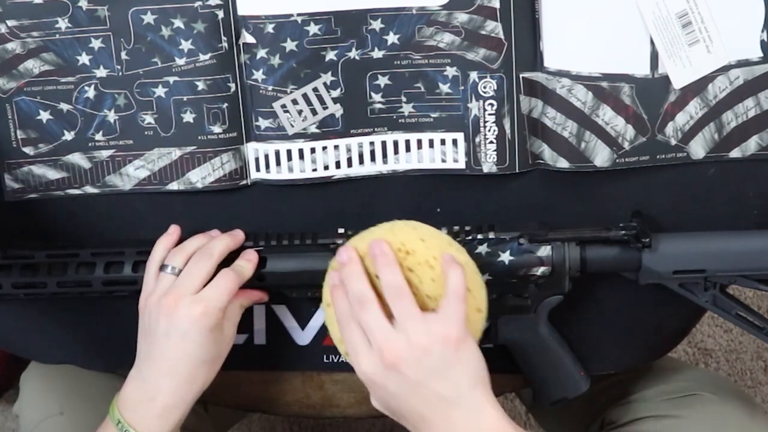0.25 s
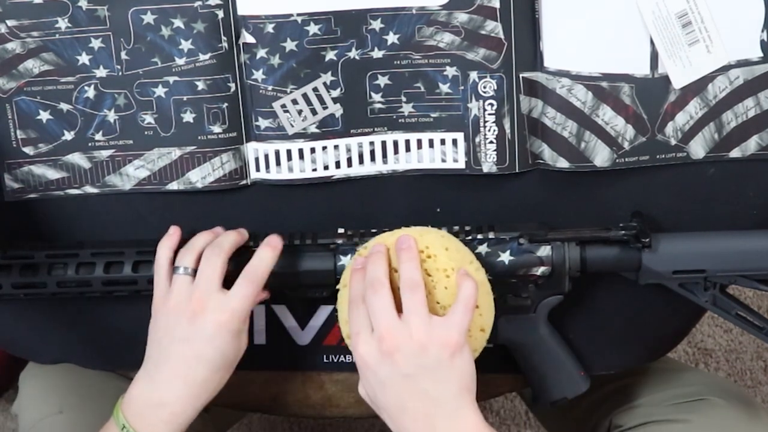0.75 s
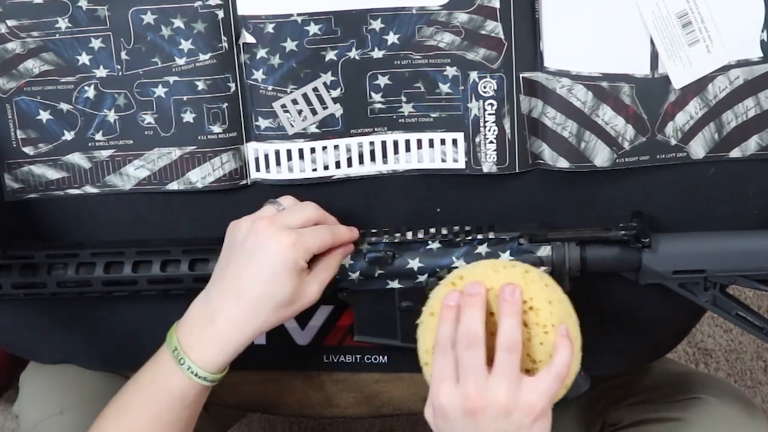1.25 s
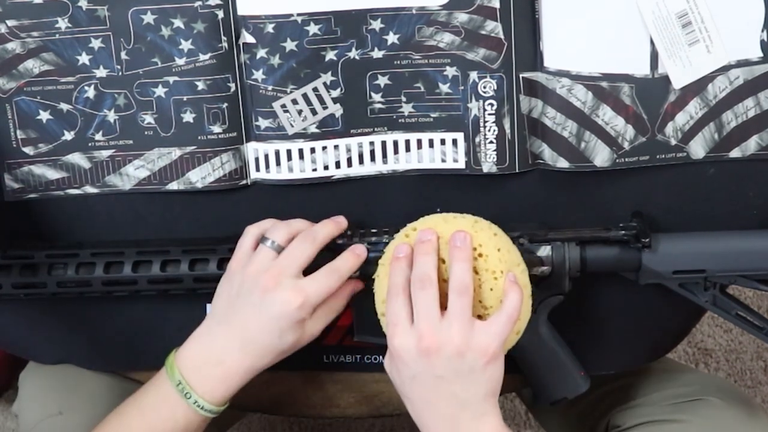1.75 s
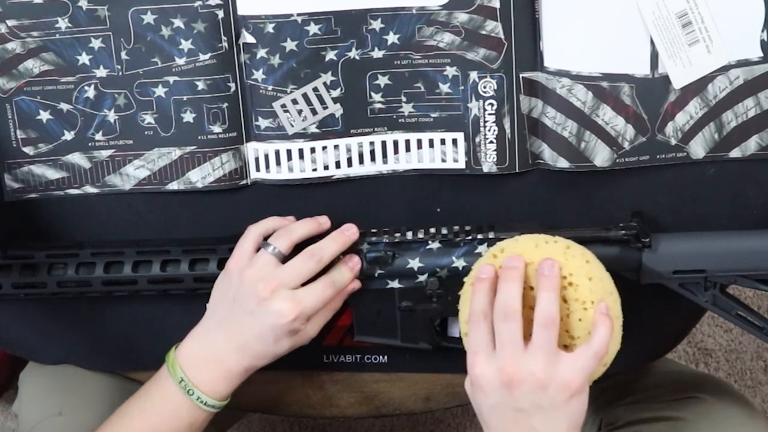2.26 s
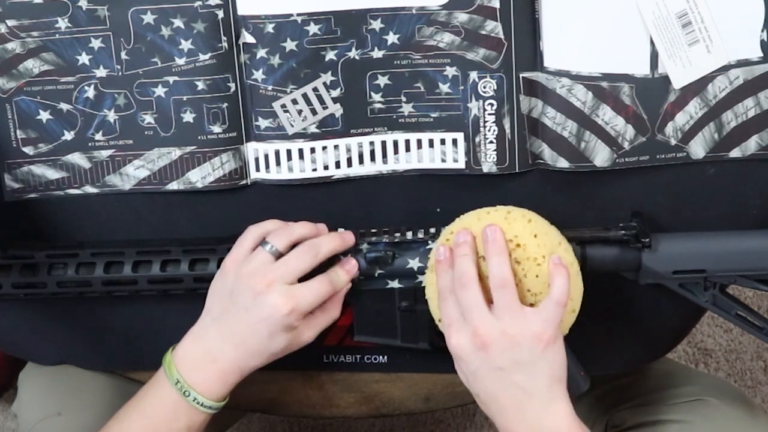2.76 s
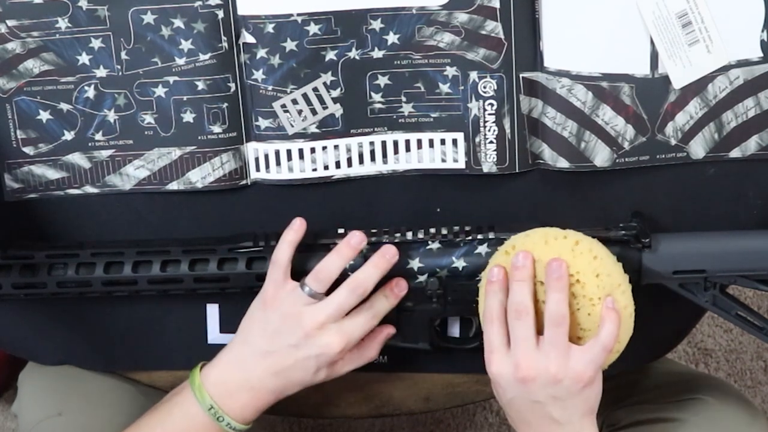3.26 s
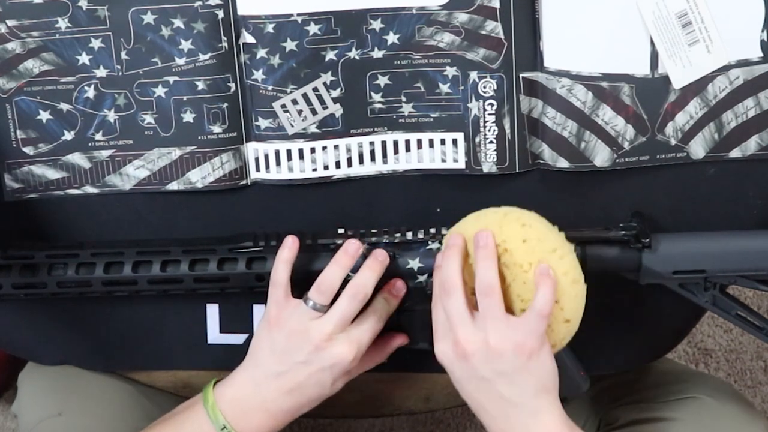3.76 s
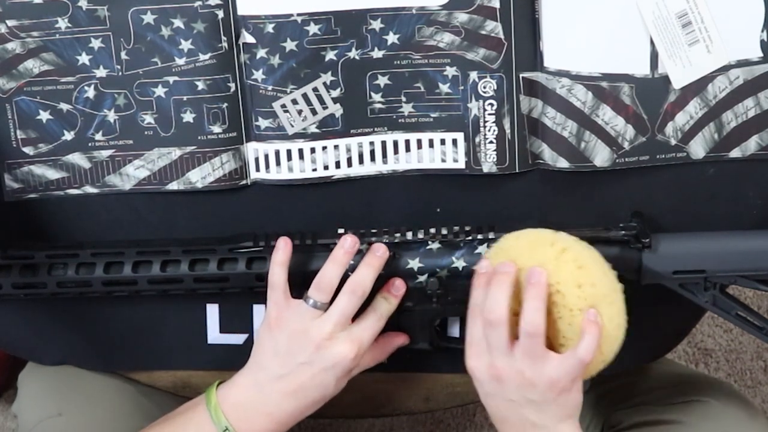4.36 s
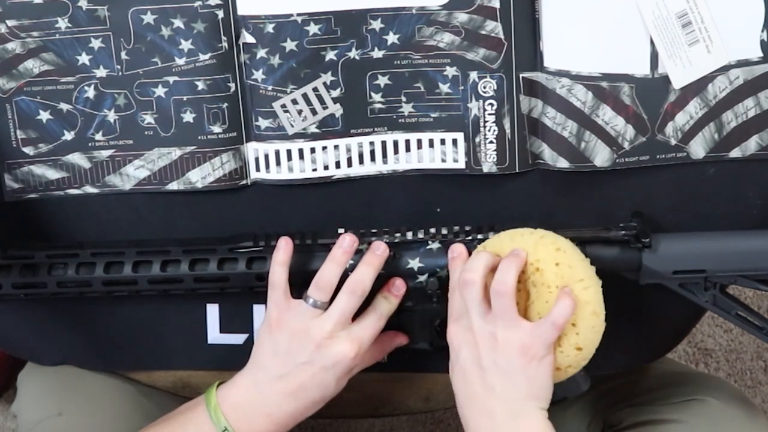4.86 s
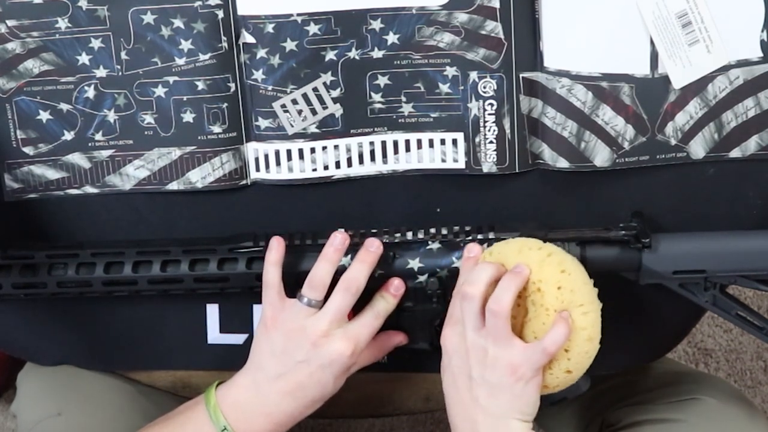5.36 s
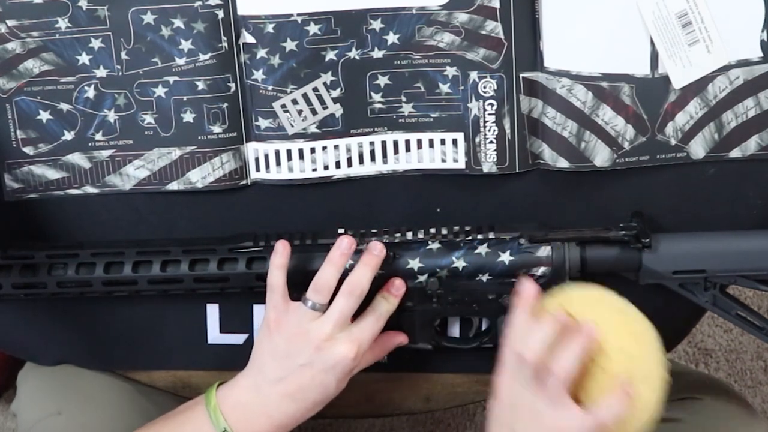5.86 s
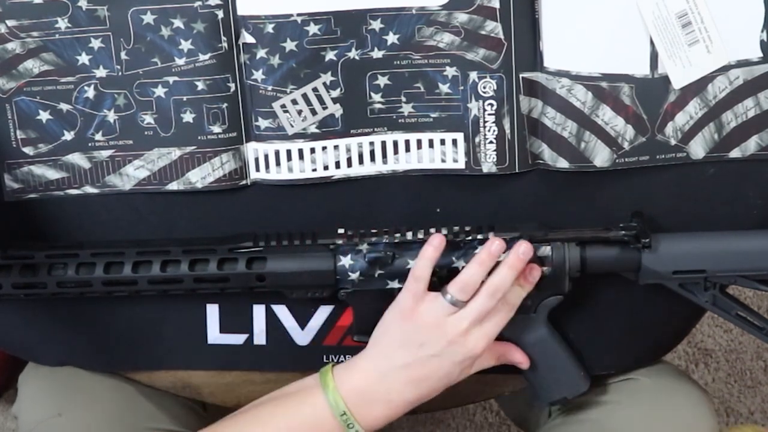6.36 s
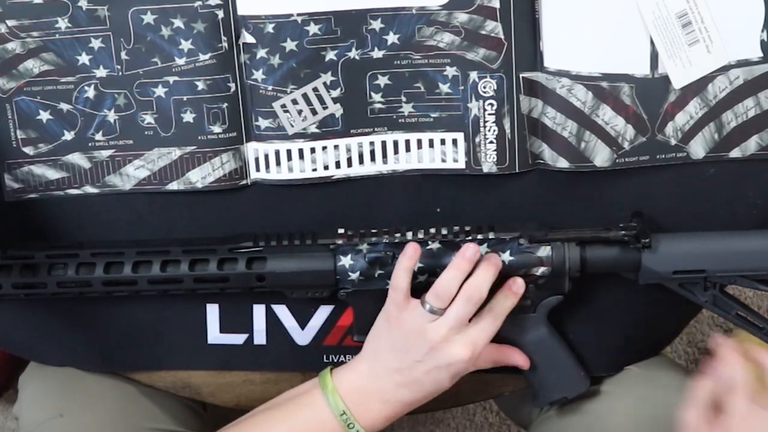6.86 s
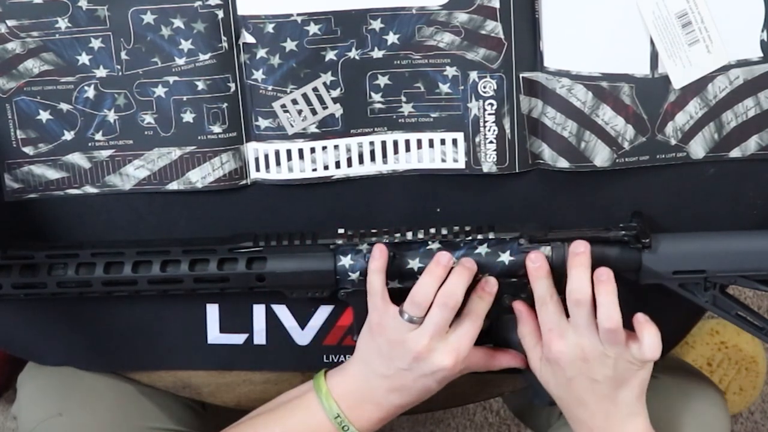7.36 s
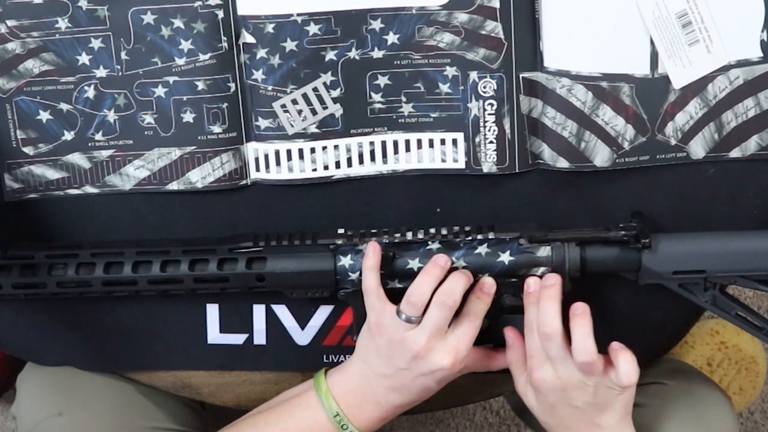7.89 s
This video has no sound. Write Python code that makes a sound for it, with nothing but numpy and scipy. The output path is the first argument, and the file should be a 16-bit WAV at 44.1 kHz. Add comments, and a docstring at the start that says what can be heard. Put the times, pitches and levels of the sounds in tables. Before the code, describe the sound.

Close and nearly dry in a small room, a sponge rubs plastic film on a metal part. An early double thump shakes the table, then soft scuffs, light ticks and sparse creaks follow. After four seconds come dull knocks, then a dense burst of creaks, thumps and hard knocks. It calms to faint skin brushes and two soft bumps. A beating low motor hum and microphone hiss continue throughout.

```python
"""A sponge and bare hands rub a plastic film onto a metal part on a mat, while a beating motor hum and hiss last.
At first clumped pore releases scuff, film and sponge chatter in short creaks, and jolts shake the table's modes.
Light ticks of decaying noise and sparser strokes follow; after four seconds struck modes of the part knock.
Past five seconds creaks crowd together, with hard knocks and dull decaying bumps of the mat.
Then noise brushes softly as skin on film, and a faint rising tone and a broken whistle swell near the end."""
import sys
import numpy as np
from scipy import signal
from scipy.fft import rfft, irfft, next_fast_len
from scipy.io import wavfile
from scipy.ndimage import uniform_filter1d

SR = 44100
rng = np.random.default_rng(int(sys.argv[2]) if len(sys.argv) > 2 else 0)


def put_to_file(sound):
    """Save the sound as 16-bit audio at rate SR, in the file named by the first command-line argument."""
    columns = np.atleast_2d(sound).T  # one column per channel
    safe = np.clip(columns, -1, 1)
    whole_steps = np.round(safe * 32767)
    wavfile.write(sys.argv[1], SR, whole_steps.astype(np.int16))


N = 358533

# Microphone hiss spectrum: (frequency [Hz], relative density [dB per Hz])
HISS_SPECTRUM = [(20, 4), (40, -7.5), (90, 4), (150, -6), (220, -4), (400, -9), (800, -17), (1600, -22),
                 (3200, -24), (6400, -24.5), (12000, -27), (15700, -27.5)]
# Faint noise of opposite sign in the two channels: (frequency [Hz], level relative to the hiss [dB])
SIDE_NOISE = [(60, -45), (110, -21.5), (200, -67), (380, -22), (700, -21), (1290, -29), (2380, -30.5),
              (4400, -25), (8120, -14), (15000, -10)]
HISS_DB, BAND_EDGE_HZ = -51, 15760

# Motor orders: (multiple of the turning rate [1], level [dB rms])
MOTOR_ORDERS = [(9, -61), (14, -52), (15, -52.5), (16, -63)]
# Faint rising tone, end values held outside: (time [s], level [dB rms], frequency [Hz])
RISING_TONE = [(6.6, -73, 159.5), (7.0, -58.5, 168.5), (7.7, -58, 186.2), (8.0, -68, 188)]
MOTOR_HZ, FIRST_THROB_S = 16.6627, 0.006  # turns a second, moment when the orders first align

# Hands jolt the table; times under 5 ms act as 5 ms: (peak time [s], level of the top's mode [dB],
# its frequency [Hz], 20 dB rise [s], 20 dB fall of the top [s], sway of the legs relative to the top [dB])
TABLE_JOLTS = [(.17, -48, 82.2, -0.06, 0.28, -1), (.322, -13, 77.1, .02, 0.0574, -9.5),
               (.365, -17, 79.6, .04, 0.0636, -6), (.62, -52, 77.6, 0.2, 0.14, 6.5),
               (.86, -47, 83, 0, -0.18, -10), (.954, -40.5, 85, 0.04, 0.03, -14),
               (1.24, -48, 79.8, .12, .06, 3), (1.42, -49, 78, .1, .13, -8),
               (1.575, -45, 78, 0.05, 0.16, -20), (1.72, -47, 78, .3, 0.13, -20),
               (1.933, -36, 83.7, 0, 0.06, -15), (2.165, -47.5, 85, .13, 0.1, -5),
               (2.33, -47.5, 82.8, 0.1, 0.1, -11), (2.77, -45.5, 75, 0.17, .18, -1.5),
               (3.28, -47.5, 77.7, 0.06, 0.08, 7), (3.475, -33, 78, 0.09, 0.04, -5),
               (3.55, -38, 78.02, 0.22, 0.1, -15), (4.38, -46.5, 88, -0.1, 0.04, 7.5),
               (4.86, -58, 87.7, -0.08, .08, 11.5), (5.06, -23, 82.9, 0.04, 0.03, -28),
               (5.155, -29, 81.5, 0.06, 0.04, -8), (5.215, -26.5, 80.6, .08, .08, -8),
               (5.27, -20.5, 81, 0.08, .05, -14), (5.38, -25.5, 85.7, .08, 0.11, -23),
               (5.47, -39, 83.8, -0.02, 0, -3), (5.59, -26.5, 84, 0.12, 0.11, -13),
               (5.7, -24, 82.6, .11, .12, -23), (5.82, -22, 82.6, 0.06, .07, -12),
               (6.0, -50.5, 85, 0.26, 0.24, -4), (6.44, -27.5, 78, 0.04, 0.1, -15.5),
               (6.58, -36, 77.7, 0.02, 0.1, -2), (7.15, -37, 81, 0.03, 0.04, -21),
               (7.33, -48, 82.4, 0.2, 0.06, -2), (8.12, -49, 82, 0.2, 1, -15)]
JOLT_ROUNDNESS, SWAY_FALL_RATIO = 1.24, 2.3  # 1 = pointed peak, 2 = round; fall of legs over fall of top
STILL_DB, STILL_HZ, STILL_SWAY_DB = -65, 83.2, -62  # the table between jolts
TOP_WAVER = 0.03  # rms share of the top's frequency
SWAY_HZ, SWAY_DRIFT_HZ = 45.7, 3.1  # centre, rms deviation
RATTLE_HZ, RATTLE_DRIFT_HZ, RATTLE_DB = 350.5, 25, -30  # centre, rms deviation, relative to the top

# Dull bumps: (time [s], nominal level [dB], high modes relative to low [dB], 60 dB decay [s])
DULL_BUMPS = [(0.312, -31, -10, 0.22), (0.351, -28, -1, 0.073), (0.443, -29.5, -23, 0.076),
              (3.267, -48, -2.5, 0.15), (3.459, -39, -5, 0.1), (5.519, -35, -2.5, 0.15),
              (5.649, -34.5, -7, 0.15), (5.79, -39.5, -3, 0.11), (5.875, -53, 10, 0.12),
              (6.536, -27.5, -19, 0.092), (6.572, -30, -16.5, 0.17)]
# Low, then high modes of mat and table top: two lists of (frequency [Hz], relative level [dB])
MAT_MODES = [(108, 3.5), (135, -1), (160, -20)], [(285, 0.5), (350, 0), (430, -11.5)]

# Faint fuzzy whistle, end values held outside: (time [s], level before its flutter [dB rms])
WHISTLE = [(6.9, -76), (7.2, -71), (7.55, -82)]
WHISTLE_HZ = 1314

# Skin brushes the film: (peak time [s], peak envelope [dB], half length to 1/e [s])
SKIN_BRUSHES = [(6.25, -54.5, 0.04), (6.631, -57.5, .02), (6.818, -54, 0.039), (7.239, -53.5, 0.021)]
# Spectrum of skin on film: (frequency [Hz], relative density [dB per Hz])
SKIN_SPECTRUM = [(2000, -12), (3300, -11.5), (4200, -5.5), (5000, -14), (6000, -18), (9000, -23)]

# Modes of the metal part on the mat: (frequency [Hz], relative level [dB], 60 dB decay [s])
PART_MODES = [(586, -2.5, 0.013), (783, -15, .025), (982, -10, 0.043), (1210, -6.5, 0.023),
              (1784, 4, 0.017), (2110, 3.5, 0.017), (2770, -1, 0.031), (3230, 6.5, .015), (3900, 4, 0.018)]
MODE_DETUNE = 0.02  # rms share of a mode's frequency
# Taps of nail, ring or part: (time [s], nominal level [dB], struck region [Hz], relative tick [dB])
HAND_TAPS = [(.472, -48, 3100, 10), (0.5, -50, 3100, 17), (0.869, -45, 3140, 14.5), (4.336, -25, 700, -17),
             (4.647, -19.5, 600, -13.5), (5.783, -11.5, 660, -19), (5.863, -16, 600, -32),
             (6.464, -40, 4150, -10), (6.679, -33.5, 1030, -9), (8.056, -30.5, 1152, -7.5),
             (1.946, -44.5, 2990, -4), (1.969, -46, 3000, -2)]

# Slips of sponge and film: (time [s], nominal level [dB], answering region [Hz], relative crack [dB])
FILM_SLIPS = [(0.291, -33, 985, -9), (0.31, -28.5, 2320, -4), (0.338, -32.5, 1830, -2),
              (1.168, -29, 1810, -1.5), (1.196, -28.5, 1270, -7), (1.53, -37, 1800, -5),
              (2.582, -39.5, 1450, -3), (2.819, -40, 802, 0), (2.93, -30, 1310, -5),
              (3.339, -32.5, 810, -9), (4.029, -38, 1550, -6), (5.215, -30, 980, -8.5),
              (5.314, -33, 982, -6.5), (5.348, -30, 1434, -6), (5.389, -37.5, 1670, -1.5),
              (5.415, -32.5, 3160, -1.5), (5.488, -33, 2078, 1), (5.507, -29, 2257, 0),
              (5.523, -28, 1650, -1), (5.54, -31, 1134, -14), (5.556, -26.5, 1094, -5.5),
              (5.59, -25.5, 1702, -8), (5.615, -28, 1090, -5), (5.644, -26, 1091, -10),
              (5.654, -24, 2635, -6), (5.69, -29.5, 1133, -8), (5.709, -32.5, 1076, -2.5),
              (5.744, -28, 1687, -6.5), (5.792, -30.5, 2000, -2.5), (6.915, -41, 1250, -3)]
SLIP_S = 0.0094  # time scale of one run of chatter

# Strokes of sponge and fingers; times under 5 ms act as 5 ms: (peak time [s], scrape level [dB],
# 20 dB rise [s], 20 dB fall [s], film rustle relative to scrape [dB], dull drag relative to scrape [dB])
RUB_STROKES = [(.12, -60, 0.1, .3, -2, 0), (.23, -57.5, 0.05, 0.23, 1, -10),
               (0.331, -45, 0.13, 0.0662, -1, 1.5), (.5, -64.5, 0.5, 0.2, 0.5, 0),
               (.78, -59.5, -0.04, .4, 0.5, 3), (.94, -59.5, 0.2, 0.37, 2.5, -5.5),
               (1.145, -53.5, .04, .1, 6, 1), (1.185, -48, 0.0649, 0.07, 5, 1),
               (1.269, -56.5, 0, 0.12, -2.5, 2), (1.53, -53.5, -0.07, 0.05, -2, -9),
               (1.92, -57.5, 0.27, 0.48, 1, -5), (2.14, -48, 0.05, .1, -3.5, -6),
               (2.185, -46.5, .1, .045, 0, -2), (2.4, -64.5, 0.5, .4, 1.5, 0),
               (2.69, -56, 0.45, 0.2, -2.5, 0.8), (2.84, -55.5, 0.18, 0.23, 2.5, -2),
               (2.926, -41, 0.0851, 0.0558, -3.5, -7), (3.34, -53.5, .04, 0.04, -4, -2),
               (3.43, -61, 0.2, 0.25, 0.5, 1), (3.63, -50, 0.21, 0.18, -5, -3),
               (3.695, -52, 0.16, .05, 3, 0.5), (3.93, -60.5, 0.2, 0.47, -1.5, -7),
               (4.391, -46.5, 0.1251, 0.07, 0, -3.5), (4.65, -54.5, .03, 0.1, -8, 4.5),
               (4.76, -55.5, 0.14, 0.2, -3, 5), (4.88, -56, 0.1, .11, -4, -6),
               (5.2, -63.5, 0.2, -0.3, -7, 2), (5.43, -61, .25, 0.56, 4, 2),
               (5.53, -50, 0.12, .4, -4.5, -8), (5.63, -53, 0.35, 0.16, -7, 2),
               (5.72, -49, 0.09, .15, -3.5, -4), (5.8, -50, .15, 0.16, -4, -2.5),
               (5.885, -49, 0.2, 0.09, 0, 1.5), (6.85, -65, 0.7, 0.1, 3, -2)]
STROKE_ROUNDNESS = 1.16
# Hands lying on the film between strokes: (scrape level [dB], relative rustle [dB], relative drag [dB])
RESTING_HANDS = (-69, 0, 1)
# Friction spectra from low to high, each: (frequency [Hz], relative density [dB per Hz])
DRAG_SPECTRUM = [(200, -3), (420, 1), (600, 5.5), (1000, 1.5), (1300, -19), (1800, -51)]
SCUFF_SPECTRUM = [(200, 11.5), (420, 1), (600, 5), (1000, 1.5), (1700, 0), (2300, 2), (3200, -39)]
SCRAPE_SPECTRUM = [(700, -28), (1100, 1), (1700, 5), (2300, -8), (3200, -23)]
RUSTLE_SPECTRUM = [(1500, -21), (2300, 1), (3700, 2), (4600, -2.5), (5200, -6), (5800, -17.5), (7000, -80)]
FIZZ_SPECTRUM = [(4500, -50), (6000, -4.5), (8200, 2.5), (10500, -5.5), (13000, -10), (15500, -28)]


def gain_of(db):
    """Logarithmic levels: 20 dB is a factor of ten in amplitude."""
    return 10 ** (np.asarray(db) / 20)


def evened(x):
    """Normalisation: mean power becomes one."""
    return x / np.sqrt(np.mean(x ** 2) + 1e-20)


def curves(rows):
    """Linear interpolation of each column over time."""
    s, *columns = np.transpose(rows)
    return [np.interp(np.arange(N) / SR, s, column) for column in columns]


def coloured(x, points):
    """Linear filtering: a spectrum drawn on a log-frequency axis weights the input."""
    f, db = np.transpose(points)
    size = next_fast_len(len(x))
    hz = np.fft.rfftfreq(size, 1 / SR)
    weights = gain_of(np.interp(np.log(hz + 1), np.log(f + 1), db))
    return irfft(rfft(x, size) * weights, size)[:len(x)]


def drift(seconds):
    """Low-passed chance: white noise averaged twice wanders slowly with rms 1."""
    size = max(round(seconds * SR), 1)
    once = uniform_filter1d(rng.standard_normal(N), size)
    return evened(uniform_filter1d(once, size))


def tone(hz):
    """Phase accumulation: summed frequency gives a sine of rms 1."""
    return np.sqrt(2) * np.sin(2 * np.pi * (np.cumsum(hz) / SR + rng.random()))


def add(mix, s, sound):
    """Superposition: adds a sound at its time, cut at the end."""
    part = mix[round(s * SR):][:len(sound)]
    part += sound[:len(part)]


def swells(s, db, rise, fall, roundness, rest_db):
    """Rising and decaying power: one row a swell, the rest level last, a thousand points a second."""
    lag = np.arange(0, N / SR + .01, .001) - s[:, None]
    span = np.where(lag < 0, rise[:, None], fall[:, None])
    steps = abs(lag) / np.maximum(span, .005)
    levels = db[:, None] - 20 * steps ** roundness
    rest = np.full(lag.shape[1], rest_db)
    return gain_of(np.vstack([levels, rest])) ** 2


def follow(power, values=None):
    """Power summation: the total level in dB, or a value per swell averaged by power."""
    if values is None:
        slow = 10 * np.log10(power.sum(0))
    else:
        slow = values @ power / power.sum(0)
    return np.interp(np.arange(N) / SR, np.arange(len(slow)) / 1000, slow)


def hum():
    """Beating: neighbouring orders of one motor align once a turn; a faint tone rises beside them."""
    turns = MOTOR_HZ * (np.arange(N) / SR - FIRST_THROB_S)
    orders = np.zeros(N)
    for k, db in MOTOR_ORDERS:
        wavering = gain_of(db + 0.7 * drift(0.27))
        orders += wavering * np.sqrt(2) * np.cos(2 * np.pi * k * turns)
    db, hz = curves(RISING_TONE)
    return orders + gain_of(db) * tone(hz)


def room(x):
    """Reverberation: sparse echoes of random sign decay exponentially."""
    t = np.arange(9000) / SR
    signs = rng.choice([-1., 1.], len(t))
    present = (rng.random(len(t)) < .05) * (t > .003)
    echoes = signs * present * gain_of(-60 * t / 0.053)
    return signal.oaconvolve(x, echoes / np.linalg.norm(echoes))[:N]


def table():
    """Modal vibration: the top wavers under load, slack joints add its octave, and the legs sway below."""
    s, db, hz, rise, fall, sway_db = np.transpose(TABLE_JOLTS)
    power = swells(s, db, rise, fall, JOLT_ROUNDNESS, STILL_DB)
    legs = swells(s, db + sway_db, rise, SWAY_FALL_RATIO * fall, JOLT_ROUNDNESS, STILL_SWAY_DB)
    top_hz = follow(power, np.append(hz, STILL_HZ))
    top = tone(top_hz * (1 + TOP_WAVER * drift(0.0299)))
    octave = gain_of(-22.0) * (top ** 2 - 1)  # squaring doubles the frequency
    # a higher mode of the top, stirred by the shaking
    rattle = gain_of(RATTLE_DB) * tone(RATTLE_HZ + RATTLE_DRIFT_HZ * drift(.02))
    sway = tone(SWAY_HZ + SWAY_DRIFT_HZ * drift(0.037))
    return gain_of(follow(power)) * (top + octave + rattle) + gain_of(follow(legs)) * sway


def bumps():
    """Damped modes: a soft blow swells in a few milliseconds and dies in the mat."""
    out, t = np.zeros(N), np.arange(16384) / SR
    low, high = (sum(gain_of(db) * np.sin(2 * np.pi * hz * t) for hz, db in modes) for modes in MAT_MODES)
    for s, db, high_db, t60 in DULL_BUMPS:
        envelope = gain_of(-60 * t / t60) * (1 - np.exp(-t / 0.0022))
        add(out, s, gain_of(db) * envelope * (low + gain_of(high_db) * high))
    return out


def squeak():
    """Frequency and amplitude modulation: a thin whistle wavers and breaks up."""
    flutter_db = 6.7 * np.minimum(drift(0.014), 1.2)
    hz = WHISTLE_HZ * (1 + 0.0292 * drift(0.00597))
    return gain_of(curves(WHISTLE)[0] + flutter_db) * tone(hz)


def swishes():
    t = np.arange(N) / SR
    swell = sum(gain_of(db) * np.exp(-((t - s) / half) ** 2) for s, db, half in SKIN_BRUSHES)
    return swell * evened(coloured(rng.standard_normal(N), SKIN_SPECTRUM))


def knock(hz, detune, t):
    """Modal excitation: the part's modes nearest the given frequency ring most."""
    ring = np.zeros(len(t))
    for (f, db, t60), u in zip(PART_MODES, detune):
        level = db - 60 * t / t60 - 19.4 * np.log2(f / hz) ** 2
        ring += gain_of(level) * np.sin(2 * np.pi * f * (1 + MODE_DETUNE * u) * t)
    return ring


def taps():
    """Impact: a bright tick of a few milliseconds and one knock of the part."""
    out, t = np.zeros(N), np.arange(4000) / SR
    for s, db, hz, tick_db in HAND_TAPS:
        burst, detune = rng.standard_normal(len(t)), rng.standard_normal(len(PART_MODES))
        tick = evened(coloured(burst, RUSTLE_SPECTRUM)) + 0.7 * evened(coloured(burst, FIZZ_SPECTRUM))
        fading_tick = 0.25 * gain_of(tick_db - 60 * t / 0.018) * tick
        add(out, s, gain_of(db) * (0.51 * knock(hz, detune, t) + fading_tick))
    return out


def slips():
    """Stick-slip: a short run of chatter cracks in the film and also shakes the part."""
    out, t = np.zeros(N), np.arange(4000) / SR
    run = np.exp(-(t / SLIP_S) ** 2) * (1 - np.exp(-t / 0.00022))  # quick onset, then release
    for s, db, hz, crack_db in FILM_SLIPS:
        burst, detune = rng.standard_normal(len(t)), rng.standard_normal(len(PART_MODES))
        body = evened(0.44 * coloured(burst, SCUFF_SPECTRUM) + coloured(burst, RUSTLE_SPECTRUM))
        crack = body + gain_of(-11.5) * evened(coloured(burst, FIZZ_SPECTRUM))
        ring = signal.oaconvolve(run * burst, knock(hz, detune, t))[:len(t)]
        shaken_part = 0.44 * ring / abs(ring).max()
        add(out, s, gain_of(db) * (shaken_part + .5 * gain_of(crack_db) * run * crack))
    return out


def rubbing():
    """Friction as shot noise: thousands of pores catch and let go in clumps, a few of them larger."""
    s, peak_db, rise, fall, rustles, drags = np.transpose(RUB_STROKES)
    rest_db, rest_rustle, rest_drag = RESTING_HANDS
    power = swells(s, peak_db, rise, fall, STROKE_ROUNDNESS, rest_db)
    db = follow(power)
    rustle_db = follow(power, np.append(rustles, rest_rustle))
    drag_db = follow(power, np.append(drags, rest_drag))
    sizes = gain_of(1.15 * np.minimum(rng.exponential(1, N), 5) + 1.62 * drift(0.014))
    releases = rng.random(N) < 9000 / SR  # 9000 a second on average
    pores = evened(sizes * rng.standard_normal(N) * releases)
    fizz_db = 1.7 * rustle_db - 12.5 + 4.2 * drift(0.042)  # the finest pores follow the rustle
    layers = [(SCRAPE_SPECTRUM, 0.27 * drift(0.0083)),
              (RUSTLE_SPECTRUM, rustle_db + 1.46 * drift(0.066)),
              (FIZZ_SPECTRUM, fizz_db),
              (DRAG_SPECTRUM, drag_db)]
    return sum(gain_of(db + more_db) * evened(coloured(pores, colour)) for colour, more_db in layers)


def scene():
    """Superposition: close contact sounds excite the room; table, bumps and hum join dry."""
    close = rubbing() + slips() + taps() + swishes() + squeak()
    both = close + gain_of(-10.5) * room(close) + table() + bumps() + hum()
    return np.array([both, both])


def record(dry):
    """Shared hiss plus a faint noise of opposite sign in the two channels; a low-pass limits the band."""
    hiss, other = (coloured(rng.standard_normal(N), HISS_SPECTRUM) for _ in range(2))
    scale = gain_of(HISS_DB) / np.std(hiss)
    side = coloured(other, SIDE_NOISE)
    noisy = dry + scale * np.array([hiss + side, hiss - side])
    low_pass = signal.firwin(1023, BAND_EDGE_HZ, window=("kaiser", 10), fs=SR)
    return signal.oaconvolve(noisy, low_pass[None], "same")


dry = scene()
out = record(dry)
put_to_file(out)
```